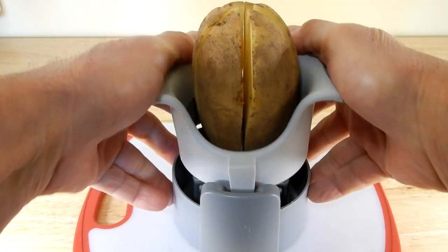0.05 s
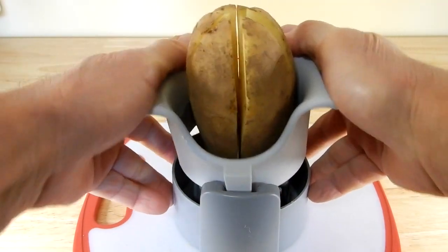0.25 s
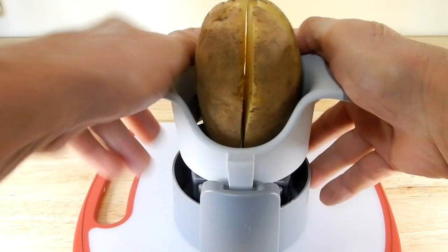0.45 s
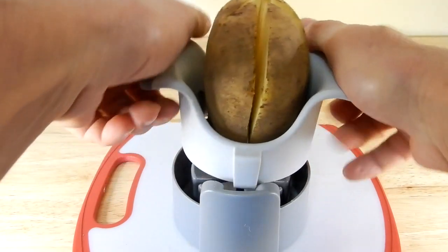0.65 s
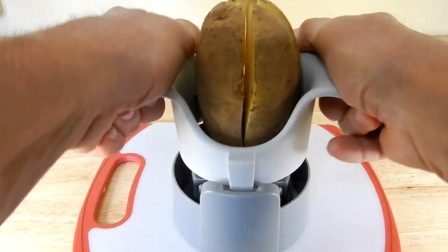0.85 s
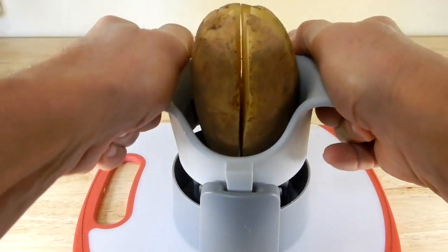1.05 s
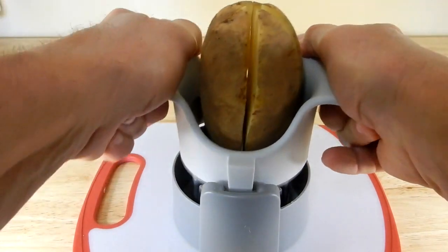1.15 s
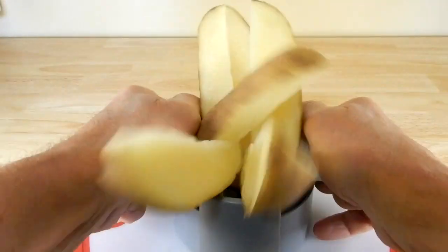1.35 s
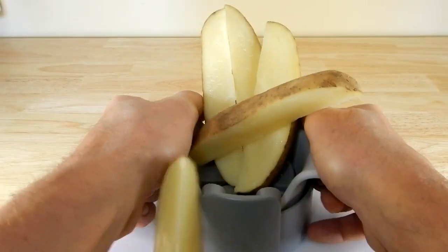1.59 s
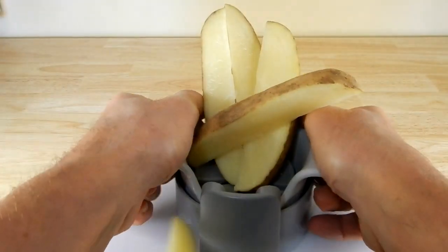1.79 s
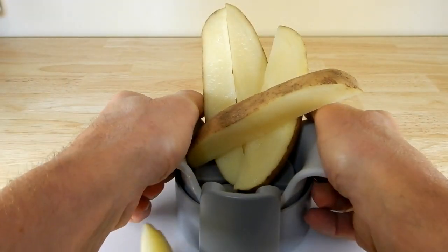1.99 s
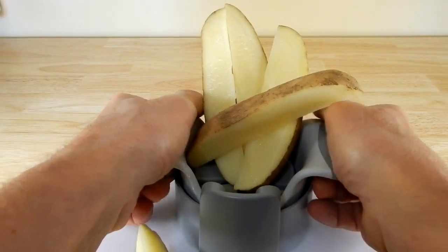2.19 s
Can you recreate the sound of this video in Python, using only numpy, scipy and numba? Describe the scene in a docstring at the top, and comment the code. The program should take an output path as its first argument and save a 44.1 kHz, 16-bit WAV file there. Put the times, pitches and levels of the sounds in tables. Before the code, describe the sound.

Loud crunchy snap as a potato bursts through a cutter, then wedges thud on a board.

```python
"""In a kitchen, a plastic wedge cutter is pressed through a raw potato on a board, close to the microphones.
Hands rub (filtered grains); handles snap and the frame clicks under load (decaying modes plus contact noise).
The potato gives way in one short crunch (swelling grains, pulsed cracks) and the frame slams onto its base.
Wedges tumble out with thuds (modes, rumble) and wet slaps (crackle). The recorder's gain control ducks at the
crunch, and the fan (coloured noise, faint wavering tone) sinks with it."""
import sys
import numpy as np
from scipy import signal
from scipy.fft import rfft, irfft, next_fast_len
from scipy.io import wavfile
from scipy.ndimage import uniform_filter1d
from numba import njit

SR = 44100
rng = np.random.default_rng(int(sys.argv[2]) if len(sys.argv) > 2 else 0)


def store_pcm(level_fs):
    """Save levels as 16-bit WAV."""
    pcm = np.round(np.clip(level_fs, -1, 1) * 32767).astype(np.int16)
    wavfile.write(sys.argv[1], SR, np.atleast_2d(pcm).T)


N = 98298
T = np.arange(N) / SR
SHORT = T[:SR // 2]


def amp(db):
    """Decibels to gain."""
    return 10 ** (np.asarray(db) / 20)


def along(points, hz):
    """Read (frequency [Hz], value) points on a log-frequency axis."""
    f, v = np.array(points, float).T
    return np.interp(np.log(np.maximum(hz, 1)), np.log(f), v)


def colour(x, points):
    """Minimum-phase filter with the given (frequency [Hz], level [dB]) response."""
    size = 2 * next_fast_len(len(x))
    log_gain = np.log(amp(along(points, np.fft.rfftfreq(size, 1 / SR))))
    cepstrum = irfft(log_gain)
    # fold onto positive time: causal response
    cepstrum[1:size // 2] *= 2
    cepstrum[size // 2 + 1:] = 0
    response = np.exp(rfft(cepstrum))
    return irfft(rfft(x, size) * response)[:len(x)]


def unit(x):
    """Scale to rms 1."""
    return x / np.sqrt(np.mean(x ** 2))


def fade(t60_s):
    """Exponential decay, -60 dB at t60."""
    return np.exp(-np.log(1000) * SHORT / t60_s)


def high_pass(x, order, hz):
    """Butterworth low cut."""
    return signal.sosfilt(signal.butter(order, hz, "high", fs=SR, output="sos"), x)


def add(track, at_s, sound):
    """Mix a sound in at a time."""
    i = int(max(at_s, 0) * SR)
    track[..., i:i + sound.shape[-1]] += sound[..., :max(N - i, 0)]


def grains(per_s, spread_db, size):
    """Random clicks of uneven strength and random sign, rms 1."""
    hits = rng.random(size) < per_s / SR
    signs = np.sign(rng.standard_normal(size))
    strength = amp(spread_db * np.minimum(rng.exponential(size=size), np.pi))
    return unit(hits * signs * strength)


# contact noise of plastic: (frequency [Hz], level [dB])
CONTACT_COLOUR = [(40, -26.5), (200, -7), (900, 9), (2500, 4.5), (5000, -2), (9000, -9), (16000, -19)]
GRIT_T60_S = 0.0091


def strike(modes, rise_s, grit_db):
    """Struck body: decaying modes with peak 1 plus a short burst of contact noise."""
    ring = sum(amp(db) * fade(t60) * np.sin(2 * np.pi * hz * SHORT) for hz, db, t60 in modes)
    ring = ring * (1 - np.exp(-(SHORT / rise_s) ** 2))
    grit = unit(colour(rng.standard_normal(len(SHORT)), CONTACT_COLOUR)) * fade(GRIT_T60_S)
    return ring / np.abs(ring).max() + amp(grit_db) * grit


# tearing flesh: (frequency [Hz], level [dB])
FLESH_COLOUR = [(30, -34.5), (150, -12.5), (450, -11.5), (700, -20), (1100, -2.5), (1600, -8), (2120, 2),
                (2500, -13), (3200, 1), (3800, -6), (4600, 0), (5600, -12.5), (6800, -10.5), (8800, -22),
                (13000, -26.5), (16000, -39)]
CUT_START_S, CUT_END_S, CUT_RISE_S, CUT_FALL_S = 1.4225, 1.473, 0.0016, 0.012
CUT_DB, CUT_SWELL_DB_PER_S = -17, 331.5
CELLS_PER_S, CELL_SPREAD_DB = 7000, 0.5


def crunch():
    """Cells burst along the blades as dense grains, harder and harder until the cut ends."""
    since_s = np.clip(T, CUT_START_S, CUT_END_S) - CUT_START_S
    force = amp(CUT_DB + CUT_SWELL_DB_PER_S * since_s)
    force = force * (1 - np.exp(-since_s / CUT_RISE_S))
    force = force * np.exp(-np.maximum(T - CUT_END_S, 0) / CUT_FALL_S)
    cells = grains(CELLS_PER_S, CELL_SPREAD_DB, size=N)
    return colour(cells * force, FLESH_COLOUR) / colour(cells, FLESH_COLOUR).std()


# ticks under load, big splits in the flesh, wedges parting:
# (time [s], level [dB], decay constant [s], pitch [Hz])
SPLITS = [(.1005, -28, .002, 700), (0.191, -37.5, .001, 5100), (0.2708, -43, .001, 6900),
          (0.811, -35, .001, 6230), (0.9037, -31.5, .002, 4160), (.9062, -27, .002, 1360),
          (1.4227, -7, .002, 2190), (1.4299, -10, 0.0027, 3800), (1.4321, -2.5, 0.0019, 2620),
          (1.4357, -3, .001, 2200), (1.4445, -0.5, .0012, 6240), (1.4495, -1.5, .001, 2120),
          (1.456, -0.5, .0012, 3030), (1.4639, -3.5, .003, 4650), (1.4667, 9, .0015, 4540),
          (1.4672, 12.5, .001, 1596), (1.7774, -27, .002, 7500), (2.0174, -12, 0.00067, 5940),
          (2.1405, -17, .001, 4520)]
# colour of a split: (ratio to its pitch, level [dB])
SPLIT_SHAPE = [(.05, -33), (.4, -17.5), (.75, -4.5), (1, 6.5), (1.25, -9), (2.3, -21), (8, -32.5)]
SPLIT_EDGE_DB = 14


def splits():
    """Each split opens with one sharp pulse and runs on as noise for a few milliseconds."""
    out, t = np.zeros(N), SHORT[:SR // 10]
    for at_s, db, decay_s, hz in SPLITS:
        run = rng.standard_normal(len(t)) * np.exp(-t / decay_s)
        edge = amp(SPLIT_EDGE_DB) * (t == 0)
        crack = colour(run + edge, [(hz * ratio, shape_db) for ratio, shape_db in SPLIT_SHAPE])
        add(out, at_s, amp(db) * crack / np.abs(crack).max())
    return out


# frame hits its base and rebounds: (time [s], level [dB])
SLAMS = [(1.4699, 22), (1.4761, 11.5)]
# frame and base ringing together: (frequency [Hz], level [dB], t60 [s])
SLAM_MODES = [(194.3, -16, 0.082), (489, -23.5, 0.11), (879, -12, 0.0085), (1226, -19.5, 0.061),
              (1275, 6, 0.017), (1674, 5.5, 0.028), (2138, -8.5, 0.064), (2910, -2.5, 0.017),
              (4730, -14, 0.013)]
SLAM_RISE_S, SLAM_GRIT_DB = 0.00033, -8


def slams():
    """Frame and base ring together on impact."""
    out = np.zeros(N)
    for at_s, db in SLAMS:
        add(out, at_s, amp(db) * strike(SLAM_MODES, SLAM_RISE_S, SLAM_GRIT_DB))
    return out


# loaded frame slips in its guide: (time [s], level [dB])
SLIPS = [(0.148, -33), (0.7957, -9), (0.9041, -27), (1.3948, -16), (1.4447, 7), (1.519, 0), (1.979, -24)]
# frame ring: (frequency [Hz], level [dB], t60 [s])
FRAME_MODES = [(1050, 0, 0.041), (1436, -4.5, 0.017), (1550, -15, 0.063), (1697, -11, 0.029),
               (2100, -6.5, 0.021), (2820, -23.5, 0.018), (4800, -20, 0.012)]
FRAME_RISE_S, FRAME_GRIT_DB, FRAME_LOW_CUT_HZ = 0.00031, -30, 1120


def slips():
    """Loaded frame slips and rings, its lows cut."""
    out = np.zeros(N)
    for at_s, db in SLIPS:
        click = strike(FRAME_MODES, FRAME_RISE_S, FRAME_GRIT_DB)
        add(out, at_s, amp(db) * high_pass(click, 4, FRAME_LOW_CUT_HZ))
    return out


# plastic handles snap: (time [s], level [dB])
SNAPS = [(0.0289, -20), (0.041, -26.5), (0.3812, 0), (0.388, -6), (0.4368, -34)]
# handle ring: (frequency [Hz], level [dB], t60 [s])
SNAP_MODES = [(2525, 17.5, 0.0023), (2248, -22, 0.0048), (3070, -34, 0.015), (4640, -26.5, 0.012),
              (8320, 1, 0.0012)]
SNAP_RISE_S, SNAP_GRIT_DB = 0.0012, -19
BOARD_ECHO_S, BOARD_ECHO_DB = 0.0031, -14.5


def snaps():
    """Handles ring very briefly; the board returns one weaker echo."""
    out = np.zeros(N)
    for at_s, db in SNAPS:
        snap = amp(db) * strike(SNAP_MODES, SNAP_RISE_S, SNAP_GRIT_DB)
        add(out, at_s, snap)
        add(out, at_s + BOARD_ECHO_S, amp(BOARD_ECHO_DB) * snap)
    return out


# cutter rocks on the board, then wedges land:
# (time [s], level [dB], pitch [Hz], t60 [s], board ring [dB])
THUDS = [(.1, -27.5, 274, 0.07, -16), (.124, -31.5, 249, 0.19, -30), (0.1509, -20, 297, 0.064, -22.5),
         (0.7986, -33, 275, 0.074, -3.5), (1.495, -12, 311.5, 0.14, -12), (1.54, -14.5, 268.5, 0.14, -2.5),
         (1.774, -13, 466, 0.081, -19), (1.781, -15.5, 277.3, 0.18, -3.5), (1.815, -17, 493.4, 0.11, -1.5),
         (1.818, -21, 262.8, .3, -7), (2.0043, -9, 196.4, 0.1, -5), (2.033, -12.5, 174.5, 0.1, -21),
         (2.138, -9, 392, 0.028, -11.5), (2.15, -7, 304.7, 0.11, -10), (2.177, -21.5, 199.5, 0.12, -9)]
# partials of a thud: (ratio to its pitch, level [dB], share of its t60)
THUD_MODES = [(1, 7, 1), (1.5, -11.5, 0.99), (1.5, -21.5, .6), (2.75, -18, .45)]
# dull board rumble: (frequency [Hz], level [dB])
BOARD_COLOUR = [(60, -17), (140, -13), (260, 5.5), (540, -7), (800, -5.5), (1100, -12), (2500, -22.5),
                (12000, -54.5)]
# board's own ring: (frequency [Hz], level [dB], t60 [s])
BOARD_MODES = [(558.7, -1, 0.097), (385, -3.5, 0.075)]
THUD_RISE_S, THUD_GRIT_DB = 0.0012, -45
RUMBLE_DB, RUMBLE_T60_SHARE = -12, 0.97


def thuds():
    """Soft, heavy contacts set the board rumbling and ringing."""
    out = np.zeros(N)
    for at_s, db, hz, t60, ring_db in THUDS:
        modes = [(hz * ratio, mode_db, t60 * share) for ratio, mode_db, share in THUD_MODES]
        body = strike(modes, THUD_RISE_S, THUD_GRIT_DB)
        rumble = unit(colour(rng.standard_normal(len(SHORT)), BOARD_COLOUR))
        rumble = amp(RUMBLE_DB) * rumble * fade(t60 * RUMBLE_T60_SHARE)
        ring = amp(ring_db) * strike(BOARD_MODES, THUD_RISE_S, THUD_GRIT_DB)
        add(out, at_s, amp(db) * (body + rumble + ring))
    return out


# cut flesh slaps down: (time [s], level [dB], t60 [s], left-right [dB])
SLAPS = [(1.778, -30.5, 0.03, -5), (2.008, -16.5, 0.06, -7), (2.017, -8, 0.012, -18), (2.14, -24, 0.036, 3)]
# wet crackle: (frequency [Hz], level [dB])
WET_COLOUR = [(100, -36), (560, 15.5), (900, -2), (1600, 6.5), (2300, 2.5), (4500, 0), (6200, -9),
              (8500, -36), (15000, -57)]


def slaps():
    """Moist cut faces smack down with a brief crackle of grains."""
    out = np.zeros((2, N))
    for at_s, db, t60, pan_db in SLAPS:
        crackle = unit(colour(grains(per_s=2800, spread_db=1.5, size=len(SHORT)), WET_COLOUR))
        add(out, at_s, crackle * fade(t60) * amp([[db + pan_db / 2], [db - pan_db / 2]]))
    return out


# hands and potato skin on plastic:
# (time of peak [s], half length to 1/e [s], level [dB], scrape pitch [Hz])
RUBS = [(0.039, 0.036, -39.5, 2530), (0.116, 0.067, -53.5, 4540), (0.28, 0.16, -55, 2520),
        (0.368, 0.027, -45, 2560), (0.417, 0.023, -63, 2530), (0.538, 0.013, -49.5, 5460),
        (.655, 0.084, -47, 4760), (0.924, 0.0315, -44, 1902), (1.026, 0.035, -49, 1760),
        (1.561, 0.033, -44, 2520), (1.82, 0.038, -42.5, 4240)]
# skin on plastic: (frequency [Hz], level [dB])
SKIN_COLOUR = [(60, -28.5), (300, -13), (900, -5.5), (1700, 3), (2600, 2.5), (3800, -2), (4800, 0.5),
               (7500, -15.5), (11000, -20.5), (16000, -29)]
SCRAPE_Q, SCRAPE_DB, DRAG_NOISE_DB = 13, -2.5, -4
CATCHES_PER_S, CATCH_SPREAD_DB = 700, 0.5


def hands():
    """Skin drags and catches on the plastic in short swells, each with its own scraping resonance."""
    out = np.zeros(N)
    catches = grains(CATCHES_PER_S, CATCH_SPREAD_DB, size=N)
    drag = colour(catches + amp(DRAG_NOISE_DB) * rng.standard_normal(N), SKIN_COLOUR)
    for at_s, half_s, db, hz in RUBS:
        scrape = signal.lfilter(*signal.iirpeak(hz, SCRAPE_Q, fs=SR), drag)
        swell = np.exp(-((T - at_s) / half_s) ** 2)
        out += amp(db) * unit(drag + amp(SCRAPE_DB) * scrape) * swell
    return out


def stereo(mid, other, side):
    """Left and right: a shared part plus and minus a coloured other part."""
    return mid + colour(other, side) * np.array([[1], [-1]])


# microphone difference for the close impacts and crunch: (frequency [Hz], level [dB])
NEAR_SIDE = [(100, -0.5), (400, -26), (1200, -17), (2800, -16), (5500, -7.5), (10000, -4.5), (15000, -1)]
# microphone difference for rubs, fan and room: (frequency [Hz], level [dB])
FAR_SIDE = [(60, 1.5), (200, -12.5), (640, -10), (1400, -11), (3100, -6.5), (7000, -4), (15000, 3.5)]


def near(x, side):
    """A close sound reaches the two microphones by slightly different short paths."""
    paths = unit(rng.standard_normal(size=320))
    smeared = np.convolve(x, paths / np.sqrt(len(paths)))[:N]
    return stereo(x, smeared, side)


# fan and room noise: (frequency [Hz], level [dB])
FAN_COLOUR = [(25, -35.5), (100, -24), (170, -9.5), (290, 1), (390, -7.5), (470, -1.5), (640, -12.5),
              (850, -9), (1250, -14), (1730, -7.5), (2600, -14), (3800, -19), (4700, -18), (7000, -27.5),
              (16000, -39)]
FAN_DB, FAN_TONE_DB, FAN_TONE_HZ = -50, -55, 831.6
FAN_WAVER = 0.003  # rms share of the tone frequency


def fan():
    """Steady rush of air with one faint wavering tone."""
    mid, other = (unit(colour(rng.standard_normal(N), FAN_COLOUR)) for _ in range(2))
    waver = unit(uniform_filter1d(rng.standard_normal(N), size=2000))
    tone_hz = FAN_TONE_HZ * (1 + FAN_WAVER * waver)
    tone = np.sqrt(2) * np.sin(2 * np.pi * np.cumsum(tone_hz) / SR)
    return amp(FAN_DB) * stereo(mid, other, FAR_SIDE) + amp(FAN_TONE_DB) * tone


# kitchen decay: (band centre [Hz], t60 [s])
ROOM_T60 = [(150, 1.18), (400, 0.36), (1500, 0.2569), (5000, 0.33), (12000, 0.11)]
# kitchen tail: (frequency [Hz], level [dB])
ROOM_COLOUR = [(50, -19.5), (280, 2), (700, 7), (1100, -2), (1800, 5), (2500, 0.5), (5000, 2), (8000, -5),
               (16000, -7)]
ROOM_DB, ROOM_ONSET_S = -19.5, 0.0043


def kitchen(x):
    """Diffuse tail of noise bands: bass lingers longest, the top dies first."""
    hz = np.fft.rfftfreq(len(SHORT), 1 / SR)
    tails = []
    for _ in range(2):
        noise = rfft(rng.standard_normal(len(SHORT)))
        tail = np.zeros(len(SHORT))
        for centre, t60 in ROOM_T60:
            band = along([(f, f == centre) for f, _ in ROOM_T60], hz)  # triangular
            tail += irfft(noise * band, len(SHORT)) * fade(t60)
        tail = tail * (1 - np.exp(-(SHORT / ROOM_ONSET_S) ** 2))
        tail = colour(tail / np.linalg.norm(tail), ROOM_COLOUR)
        tails.append(signal.fftconvolve(x, tail)[:N])
    return amp(ROOM_DB) * stereo(*tails, FAR_SIDE)


STRUCK_LOW_CUT_HZ, BALANCE_DB = 199, -0.45


def scene():
    """Cutter, potato and hands close by in a kitchen; the struck sounds have a low cut."""
    struck = high_pass(slams() + slips() + snaps() + thuds(), 2, STRUCK_LOW_CUT_HZ)
    close = struck + crunch() + splits()
    rub, wet = hands(), slaps()
    direct = near(close, NEAR_SIDE) + near(rub, FAR_SIDE) + wet
    room = kitchen(close + rub + wet.mean(0))
    return (direct + room + fan()) * amp([[BALANCE_DB / 2], [-BALANCE_DB / 2]])


@njit
def duck(size, limit, fall, rise, follow, deepest):
    """Gain in dB: falls while the smoothed output is over the limit, else creeps back."""
    out, level, db = np.empty(len(size)), 0., 0.
    for i in range(len(size)):
        level += (size[i] * 10 ** (db / 20) - level) * follow
        db = max(db - fall, -deepest) if level > limit else min(db + rise, 0.)
        out[i] = db
    return out


DUCK_ABOVE_DB, DUCK_RANGE_DB, DETECTOR_S = -21.5, 25.5, 0.0011
DUCK_DB_PER_S, RECOVER_DB_PER_S = 385, 2.5
HISS_ABOVE_HZ, HISS_GATE_DB, TOP_HZ = 2300, -65.5, 15850


def record(dry):
    """Gain control, a suppressor that turns faint treble down, clipping near full scale, steep top cut."""
    gain_db = duck(np.abs(dry).mean(0), float(amp(DUCK_ABOVE_DB)), DUCK_DB_PER_S / SR,
                   RECOVER_DB_PER_S / SR, 1 / (DETECTOR_S * SR), float(DUCK_RANGE_DB))
    x = dry * amp(gain_db)
    treble_cut = signal.butter(2, HISS_ABOVE_HZ, "high", fs=SR, output="sos")
    treble = signal.sosfiltfilt(treble_cut, x)
    power = np.abs(uniform_filter1d((treble ** 2).mean(0), size=512))
    x = x - treble / (1 + power / amp(HISS_GATE_DB) ** 2)
    lowpass = signal.ellip(10, .1, 70, TOP_HZ, fs=SR, output="sos")
    return signal.sosfilt(lowpass, np.clip(x, -.9, .9))


dry = scene()
out = record(dry)
store_pcm(out)
```